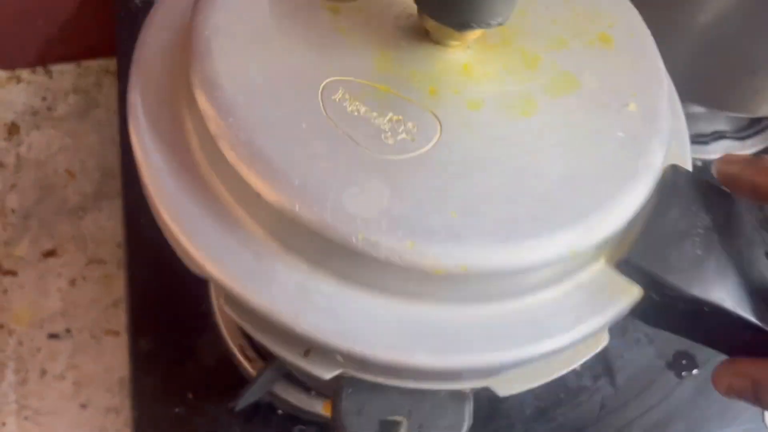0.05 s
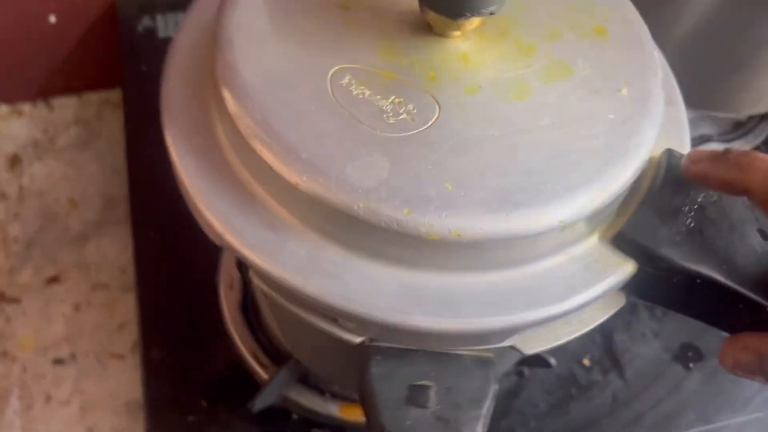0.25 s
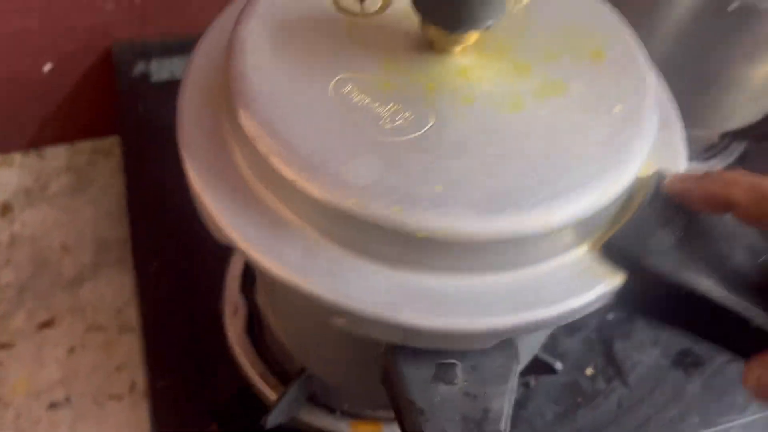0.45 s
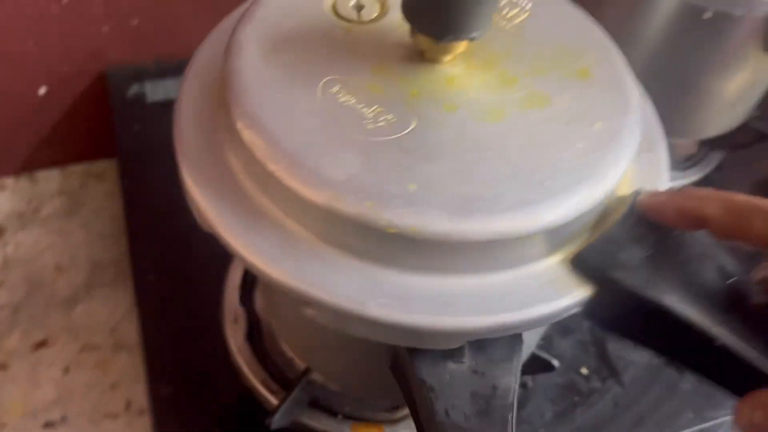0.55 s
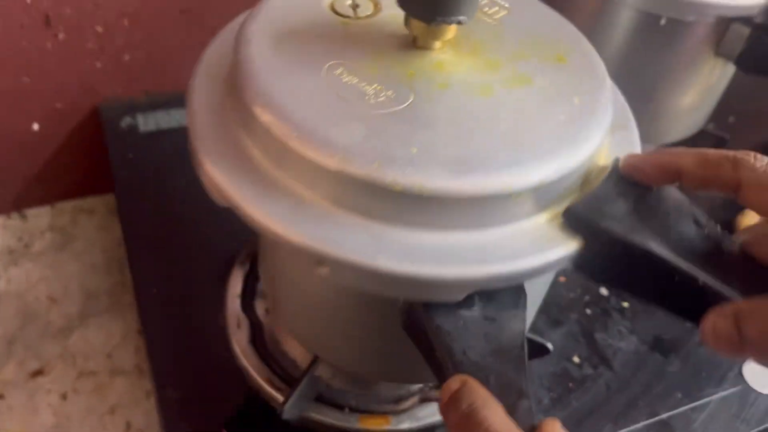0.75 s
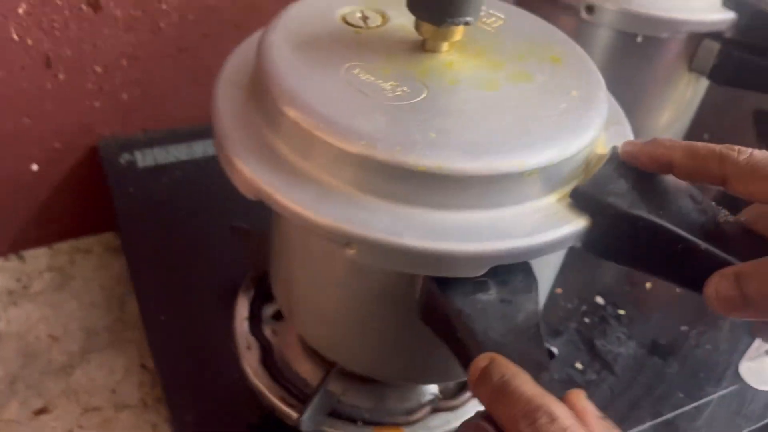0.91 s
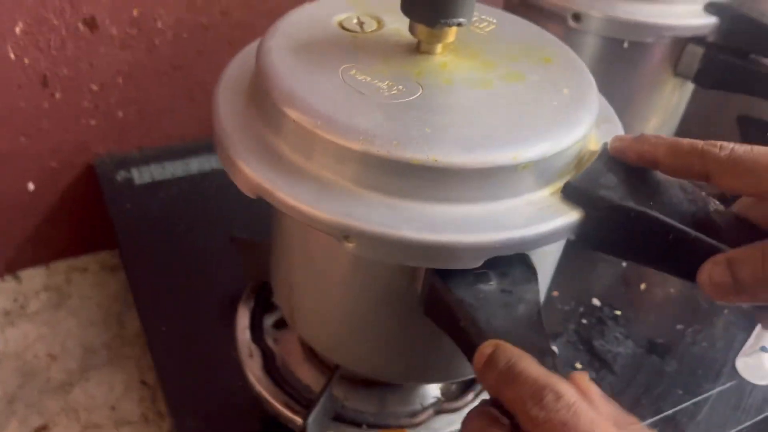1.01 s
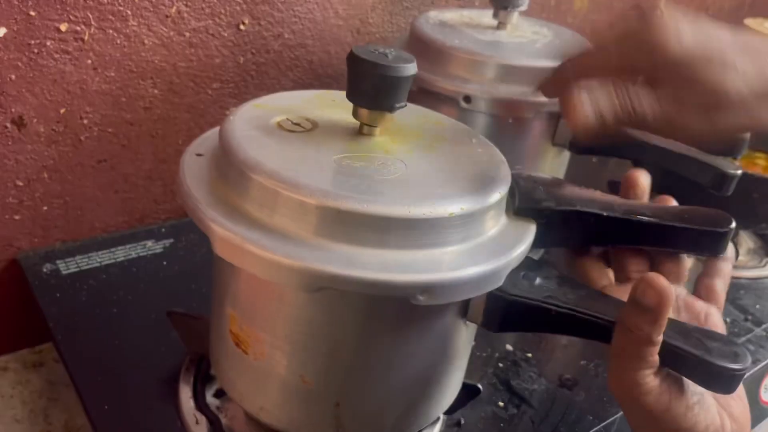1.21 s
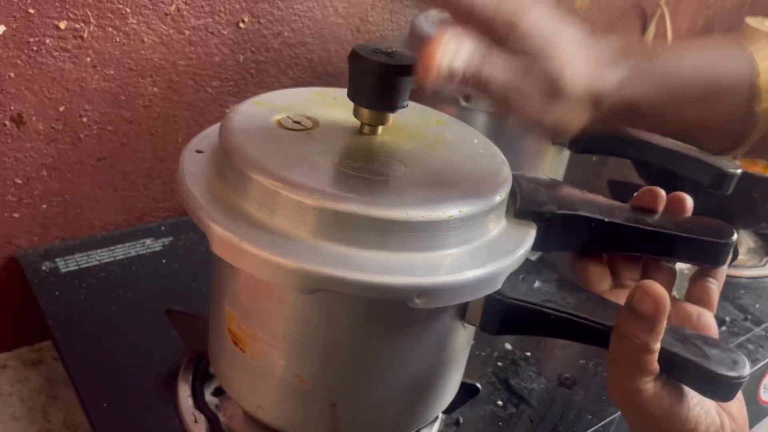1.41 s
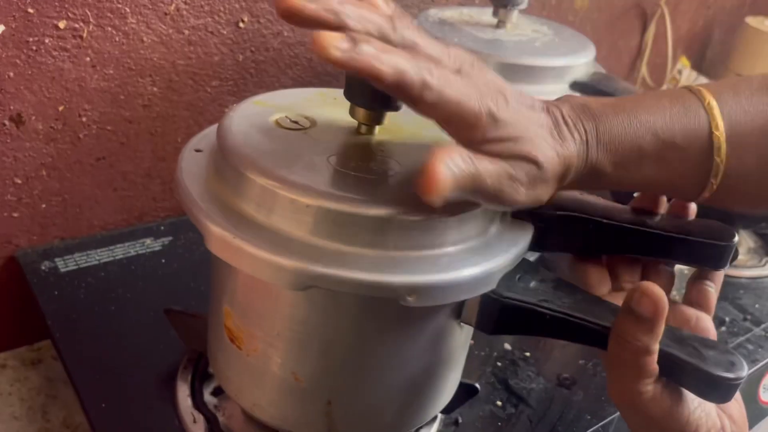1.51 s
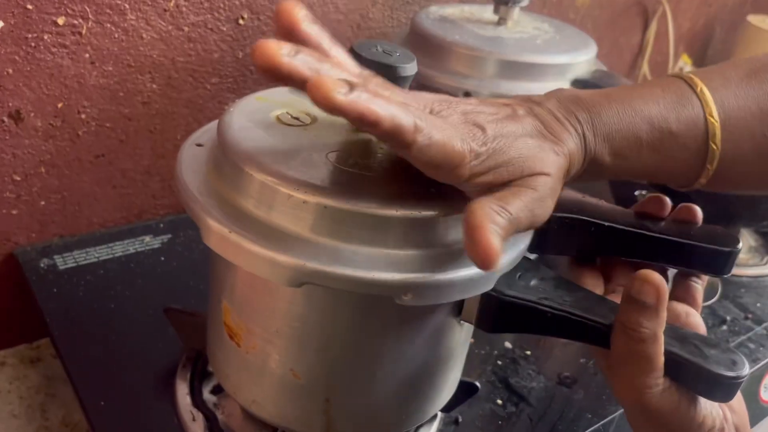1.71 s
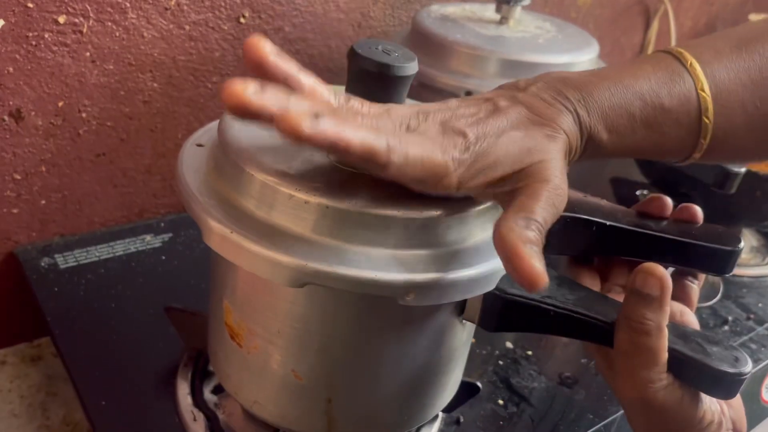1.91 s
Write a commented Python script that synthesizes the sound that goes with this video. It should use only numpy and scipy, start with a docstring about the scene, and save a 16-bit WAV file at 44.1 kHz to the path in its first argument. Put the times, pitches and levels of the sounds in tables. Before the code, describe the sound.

A metal pressure cooker lid rocks onto its pot with quick ringing clatters, faint scraping and soft hollow booms. After a brief lull come three sharp metal clicks. Heard close up in a quiet kitchen with a faint hiss.

```python
"""A lid rocked onto a pot

A thick aluminium lid rocks onto a pot: the rims clatter and scrape, each knock rings the lid,
and the air in the hollow pot booms. Three sharp metal taps follow. A quiet kitchen hums behind,
and a phone with two microphone ports listens close by."""
import sys
import numpy as np
from scipy import signal
from scipy.fft import rfft, irfft, next_fast_len
from scipy.io import wavfile
from scipy.ndimage import uniform_filter1d

SR = 44100
rng = np.random.default_rng(int(sys.argv[2]) if len(sys.argv) > 2 else 0)


def wav_out(sig):
    """Save sig, one row per channel (or a flat mono array), as 16-bit PCM at SR to the path in sys.argv[1]."""
    wavfile.write(sys.argv[1], SR, np.round(np.clip(np.atleast_2d(sig).T, -1, 1) * 32767).astype(np.int16))


N = 85995
GRIT_DB = 5.5  # how unevenly metal touches metal


def amp(db):
    return 10 ** (np.asarray(db) / 20)


def unit_level(x):
    return x / np.sqrt(np.mean(x ** 2) + 1e-20)


def curve_at(points, hz):
    f, value = np.transpose(points)
    return np.interp(np.log(hz + 1), np.log(f + 1), value)


def add(mix, start, sound):
    part = mix[..., round(start * SR):][..., :sound.shape[-1]]
    part += sound[..., :part.shape[-1]]


def resonate(x, hz, width):
    """Lets through the sound near one pitch."""
    return signal.lfilter(*signal.iirpeak(hz, hz / width, SR), x)


def steep_band(x, hz, width):
    """Three wide resonances in a row make a band with steep sides."""
    for _ in range(3):
        x = resonate(x, hz, width * 2)
    return x


def swell(t, rise_ms, fade_ms):
    """Rises to 1, then dies away. A fade time is always the time to drop 60 dB."""
    rise = max(rise_ms, .2) / 1000
    attack = np.sin(np.pi / 2 * np.minimum(t / rise, 1)) ** 2
    return attack * amp(-60 * np.maximum(t - rise, 0) / (fade_ms / 1000))


def tail(x, fades, delay_s):
    """Many tiny echoes blur into a tail; each pitch fades at its own speed."""
    echoes = np.zeros((2, SR // 2))
    at = np.arange(0, SR // 2 - 20, 10) + rng.integers(0, 10, (2, (SR // 2 - 11) // 10))
    np.put_along_axis(echoes, at, rng.choice([-1., 1.], at.shape), 1)
    echoes[:, :round(delay_s * SR)] = 0
    hz, t, spectrum = signal.stft(echoes, SR, nperseg=256)
    echoes = signal.istft(spectrum * amp(-60 * t / curve_at(fades, hz)[:, None]), SR, nperseg=256)[1]
    return signal.fftconvolve(x, echoes / np.linalg.norm(echoes[0]), axes=1)[:, :N]


def kitchen_hush():
    """Soft room noise that wavers a little, with a few faint hums."""
    # Each row: frequency in Hz, relative level in dB.
    colour = [(33, -30), (45, 7), (100, 8), (200, -2), (400, -2), (650, -17.5), (1500, -17), (3000, -28),
              (6000, -27.5), (9000, -29.5), (13000, -44.5), (14500, -30), (16000, -20.5)]
    # Each row: start and end in seconds, pitch in Hz, level in dB.
    hums = [(1.284, 1.49, 368, -51), (1.314, 1.464, 550, -60), (1.793, 1.966, 100, -48.5)]
    hz, frames = np.fft.rfftfreq(1024, 1 / SR), N // 256 + 5
    a, b, c, d, waver = rng.standard_normal((frames, 513, 5)).T
    waver = uniform_filter1d(waver, size=10, axis=0)
    waver_db = 3.6 * unit_level(uniform_filter1d(waver, size=12, axis=1))
    spectrum = np.array([a + 1j * b, c + 1j * d]) * amp(curve_at(colour, hz)[:, None] + waver_db)
    noise = signal.istft(spectrum, nperseg=1024, noverlap=768)[1][:, :N]
    out, t = amp(-45.5) * unit_level(noise), np.arange(N) / SR
    for start, end, pitch, db in hums:
        arch = np.sin(np.pi * np.clip((t - start) / (end - start), 0, 1))
        out += amp(db) * arch * np.sin(2 * np.pi * pitch * t)
    return out


def hiss():
    """Smooth high hiss that falls as the phone backs away."""
    # Each row: time in seconds, level of the upper band in dB.
    levels = [(0.0, -59), (0.314, -58.5), (0.406, -66), (1.34, -68), (1.694, -72), (1.95, -71)]
    times, db = np.transpose(levels)
    noise = rng.standard_normal((2, N))
    upper = unit_level(steep_band(noise, hz=11800, width=5000))
    lower = amp(-3.5) * unit_level(steep_band(noise, hz=5200, width=3000))
    return amp(np.interp(np.arange(N) / SR, times, db)) * (upper + lower)


def lid_rocking():
    """The pot rumbles and the rim scrapes faintly while the lid moves on it."""
    # Each row: time in seconds, level in dB.
    levels = [(0.0, -29.5), (0.124, -70), (0.28, -50), (0.416, -26.5), (0.48, -31), (0.662, -37),
              (0.864, -40), (0.976, -55.5), (1.15, -84)]
    # Each row: centre in Hz, filter width in Hz, relative level in dB.
    rumble_bands = [(300, 223, -3.5), (159.6, 174, -6)]
    times, db = np.transpose(levels)
    level = amp(np.interp(np.arange(N) / SR, times, db, right=-90))
    noise = rng.standard_normal((2, N))
    rumble = sum(amp(band_db) * unit_level(resonate(resonate(noise, hz, width), hz, width))
                 for hz, width, band_db in rumble_bands)
    grit = rng.standard_normal((2, N)) * amp(GRIT_DB * rng.standard_normal(N))
    scrape = amp(-17.5) * unit_level(resonate(grit, hz=1660, width=1330))
    return level * (rumble + scrape)


def pot_booms():
    """Air trapped under the lid gives short, soft tones."""
    # Each row: start in seconds, level in dB, pitch in Hz, rise and fade times in milliseconds.
    booms = [(.002, -32.5, 441.8, 2.6, 220), (0.059, -29, 438, 3.4, 98), (0.186, -24, 344, 9, 17),
             (0.215, -27, 404, 2, 51), (0.235, -25, 346, 11, 46), (0.308, -15, 300, 1.5, 20),
             (0.339, -20, 281, 5.7, 84), (0.377, -22, 315, 21.3, 28), (0.431, -12.5, 295, 22.8, 39),
             (.494, -17, 294.5, 14.4, 43), (.538, -32, 333, 5.5, 23), (0.577, -9, 337, 5.1, 23.3),
             (0.602, -20.5, 387, 8.2, 30), (0.619, -21.5, 300, 3.7, 20), (0.664, -42, 350, 11, 31),
             (.698, -24.5, 404, 3.4, 39), (0.723, -34, 368, 5.9, 21), (0.7567, -22, 300, 4.1, 32),
             (0.773, -23, 251.5, 8.5, 39), (0.799, -16.5, 325, 6.4, 53), (0.834, -51, 340, 3, 240),
             (.86, -35, 371, 5.5, 51), (0.894, -31, 340, 11, 34), (.932, -39, 293.5, 9.3, 110),
             (.953, -31.5, 181, 1.3, 104), (1.015, -40, 280, 8, 44), (1.176, -27, 167.4, 4.9, 47),
             (1.47, -37.5, 375, 4.6, 110), (1.565, -29, 327, 5.8, 36), (1.652, -31.5, 296, 5, 94),
             (1.685, -30, 432, 1.4, 69)]
    out, t = np.zeros(N), np.arange(9000) / SR
    for start, db, hz, rise, fade in booms:
        add(out, start, amp(db) * swell(t, rise, fade) * np.sin(2 * np.pi * hz * t))
    return out


def metal_hits():
    """Each knock or tap is a gritty burst in five bands; its blow makes the lid ring, and the burst makes it
    shimmer."""
    # Each row: start in seconds, level in dB, rise and fade times in milliseconds, centre and width of
    # the main band in Hz, then relative levels in dB of clack, bite, treble, top, ring and shimmer.
    hits = [(0.013, -40, 3.9, 15, 2040, 1240, 2.5, -5, -9, -30, -3, -7),
            (0.0556, -36, 1.32, 20, 1944, 800, 4.5, -4, -13.5, -30, -7, -9.5),
            (.189, -37.5, 1.06, 41, 1970, 900, -2, -18, -43, -40, -10, -6),
            (0.2188, -41, 1.02, 19, 2540, 1200, 4, -12.5, -28, -37, -10.5, 2),
            (.238, -46.5, 3.3, 33, 1870, 1500, 4.5, -10, -26, -37, -14, -15),
            (0.3079, -27, 0.64, 126, 2450, 1220, 0, -7, -7, -34, -2.5, -5.5),
            (0.33, -40.5, 1.42, 28, 2540, 1470, 12.5, -1, 4.5, -30, -14, -11),
            (.343, -28.5, 2.1, 34, 2350, 900, -21, -11, -6, -30, -4.5, -12.5),
            (0.387, -54, 6.1, 60, 2500, 980, 7, -20, -23, -33, -10, -8),
            (0.4069, -28, 1.16, 80, 2040, 1380, -3.5, -11.5, -2, -19, -8.5, -0.5),
            (.430, -26.5, 7, 88, 2740, 1200, -1.5, -5, -7, -31, -7, -7.5),
            (.444, -20, 4.45, 43, 2650, 1110, -4, -15, -1, -17, -8, -2.5),
            (0.464, -31.5, 6, 25, 2480, 1480, 0.5, -5, -5, -36, -7, -23),
            (0.574, -26.5, 1.38, 38, 2400, 1820, 3.5, -4.5, -5.5, -36, -2, 5),
            (.583, -15, 2.7, 58, 2320, 1460, -10, -6, -5, -17, -5.5, -8.5),
            (.598, -14, 4.1, 43, 2340, 1660, -15, -8, -6, -22.5, -17.5, -24),
            (0.644, -28.5, 3, 41, 1960, 1220, -15, -5.5, -5.5, -29, -21, -7),
            (0.697, -28.5, 3.94, 36, 1830, 1400, -23, -14.5, -5.5, -23, -8, -10),
            (0.7553, -29.5, 1, 27, 2040, 1500, -7, -6.5, -5.5, -24, -7.5, 3.5),
            (0.776, -39.5, 6.1, 130, 2250, 1170, 1, -14, -17, -21, -1, -16),
            (0.796, -27.5, 1.1, 37, 2040, 1590, 2, -24, -2.5, -26, -13, -1.5),
            (0.804, -26, 3.3, 32, 2060, 1000, -12, -4.5, -1, -24, -8.5, -17),
            (.839, -25.5, 1.26, 19, 2040, 1300, -22, -8.5, -9.5, -32, -21, -23),
            (1.172, -44.5, 3.1, 23, 2800, 1670, 2.5, -30, -11, -26, -23, -1),
            (1.197, -45.5, 1.8, 81, 2040, 850, 7.5, -14, -20, -35, -30, -4),
            (1.210, -44, 0.95, 24, 1627, 1030, 6, -17, -20, -37, -3, -5),
            (1.4697, -11, 1.1, 28, 1900, 1480, -14, -0.5, -2, -8, -10.5, -3.5),
            (1.5652, -13.5, 1.1, 14, 2480, 1300, -4, -4.5, -0.5, -8.5, -2.5, -2),
            (1.6416, -6, 2, 18, 2615, 694, -19.5, -5.5, -5.5, -18.5, -13, -8),
            (1.682, -26, 1.15, 17, 820, 510, -0.5, -9, -22, -37, -13, -7),
            (1.873, -45, 1.4, 34, 2166, 1350, 2.5, -47, -16, -38, -31, -12)]
    # The shimmer is the lid's many weak tones. Each row: frequency in Hz, fade time in seconds.
    shimmer_fades = [(800, 0.13), (2000, 0.18), (4000, 0.1), (7000, 0.17), (12000, 0.13)]
    clack, bite, treble, top = (1050, 750), (3900, 1100), (5477, 2220), (10580, 3500)  # centre, width in Hz
    bursts, blows, shimmer = np.zeros((2, N)), np.zeros(N), np.zeros((2, N))
    size = 6000
    t = np.arange(size) / SR
    for start, db, rise, fade, main_hz, main_width, *bands_db, ring_db, shimmer_db in hits:
        shape = swell(t, rise, fade)
        grit = shape * rng.standard_normal((2, size)) * amp(GRIT_DB * rng.standard_normal(size))
        click = signal.unit_impulse(size, round(rise * SR / 1000))
        bands = [(main_hz, main_width), clack, bite, treble, top]
        burst, blow = 0, 0
        for (hz, width), band_db in zip(bands, [0, *bands_db]):
            extra_fade = shape ** 0.34 if hz > 5000 else 1  # the two highest bands die sooner
            band = steep_band(grit * extra_fade, hz, width)
            band *= np.linalg.norm(shape) / np.linalg.norm(band, axis=1)[:, None]
            burst += amp(db + band_db) * band
            blow += amp(db + band_db + ring_db) * steep_band(click, hz, width)
        add(bursts, start, burst)
        add(blows, start, blow)
        add(shimmer, start, amp(shimmer_db) * burst)
    return bursts + lid_ring(blows) + tail(shimmer, shimmer_fades, delay_s=0)


def lid_ring(blows):
    """The struck lid rings in two directions; each tone has a close twin, so the ring pulses."""
    # The pitches of the lid's tones in Hz.
    pitches = [1126, 1380, 1665, 1921, 2115, 2374, 2745, 3110, 3700, 4398, 5050, 5830, 6460, 7850]
    # Each row, one per pitch: relative level in dB, fade time in seconds.
    tones = [(-31, 0.35), (-8, 0.17), (-0.5, 0.095), (0.5, 0.04), (-2, 0.098), (-3, 0.086), (-12, 0.055),
             (-8, 0.21), (-26, 0.049), (-3.5, .24), (-12, .15), (-6.5, 0.12), (-14, 0.29), (8.5, 0.081)]
    twin_gap_hz, twin_db = 29, -4

    def tone(hz, fade):
        decay_rate = np.log(1000) / fade
        return resonate(blows, hz, decay_rate / np.pi) * SR / (2 * decay_rate)

    ring = 0
    for hz, (db, fade) in zip(pitches, tones):
        twin = amp(twin_db) * np.outer([1, -1], tone(hz + twin_gap_hz, fade))
        ring += amp(db) * (tone(hz, fade) + twin)
    return ring


def scene():
    """Lid, pot and kitchen together, as two shares of the sound that reaches the phone."""
    # The kitchen's echo. Each row: frequency in Hz, fade time in seconds.
    room_fades = [(250, 0.58), (1000, 0.3), (2500, 0.33), (6000, 0.34), (12000, 0.27)]
    metal, pot = metal_hits(), pot_booms()
    echo = tail(amp(-12.5) * metal + amp(-11) * pot, room_fades, delay_s=0.0033)
    return metal + pot + echo + lid_rocking() + kitchen_hush() + hiss()


def record(dry):
    """The phone's two ports hear mostly the same sound, each with its own timing and level."""
    # Each row: frequency in Hz, how alike the ports are from 0 to 1.
    likeness = [(60, 1), (300, 0.91), (600, 1), (1300, 0.33), (2500, 0.99), (5000, 0.75), (7000, 0.58)]
    # Each row: frequency in Hz, how far the left wave runs ahead in radians.
    left_lead = [(300, 0.01), (780, 1.34), (1800, -0.19), (2900, 1.5), (4300, 1.46), (5500, -1.26),
                 (6600, -1.36)]
    # Each row: frequency in Hz, half cycles the right wave runs ahead (even: in step, odd: opposed).
    treble_steps = [(7900, 1), (9500, 1), (10500, 2), (13500, 2), (14300, 3), (17000, 3)]
    # Each row: frequency in Hz, how much louder the left is in dB.
    balance = [(60, 0.6), (370, 1), (670, 0), (1220, 0.3), (2230, 5), (4080, 4), (6500, 3.1)]
    bass_cut_hz, treble_cut_hz, ceiling = 40, 16200, 1.1
    alike_hz = treble_steps[0][0]  # from here up the ports are fully alike and equally loud
    size = next_fast_len(N + 4096)
    hz = np.fft.rfftfreq(size, 1 / SR)
    shared, separate = rfft(dry, size) / np.sqrt(1 + (bass_cut_hz / (hz + 1)) ** 8)
    alike = np.clip(curve_at(likeness + [(alike_hz, 1)], hz), 0, 1)
    lead = curve_at(left_lead + [(f, -np.pi * halves) for f, halves in treble_steps], hz)
    lean_left = amp(curve_at(balance + [(alike_hz, 0)], hz) / 2) * np.exp(.5j * lead)
    left = shared * lean_left
    right = (alike * shared + np.sqrt(1 - alike ** 2) * separate) / lean_left
    ports = irfft(np.array([left, right]), size)[:, :N]
    ports = ceiling * np.tanh(ports / ceiling)  # loud peaks gently overload the input
    treble_cut = signal.firwin(511, treble_cut_hz, window=("kaiser", 9), fs=SR)
    return signal.oaconvolve(ports, treble_cut[None], "same")


dry = scene()
out = record(dry)
wav_out(out)
```